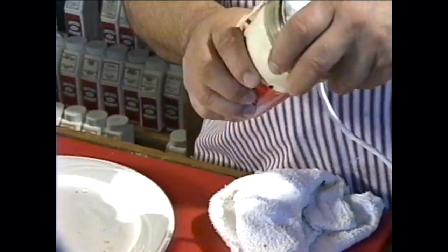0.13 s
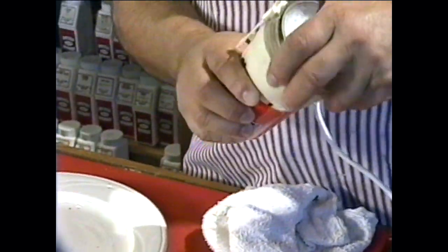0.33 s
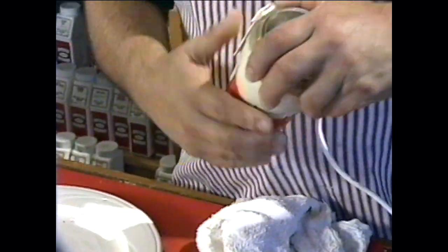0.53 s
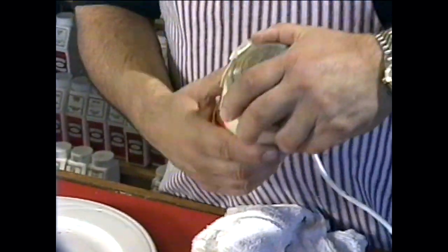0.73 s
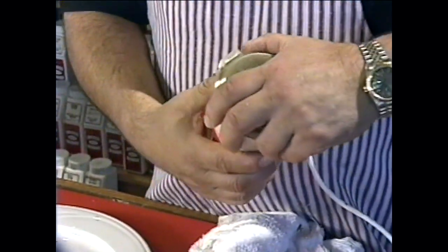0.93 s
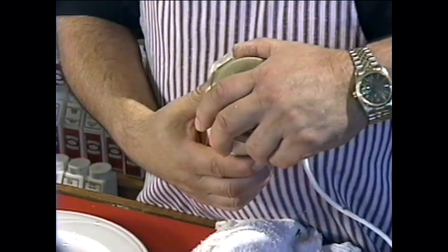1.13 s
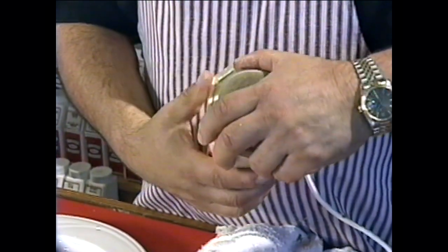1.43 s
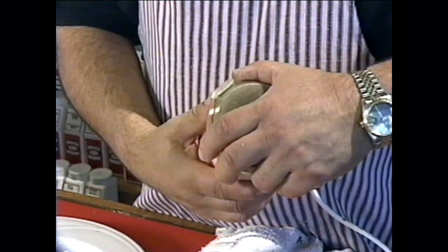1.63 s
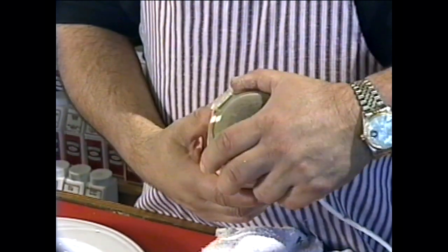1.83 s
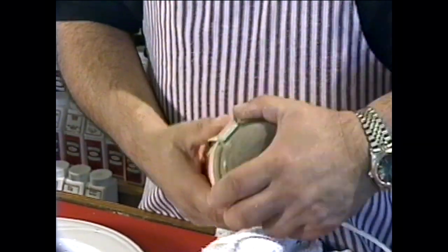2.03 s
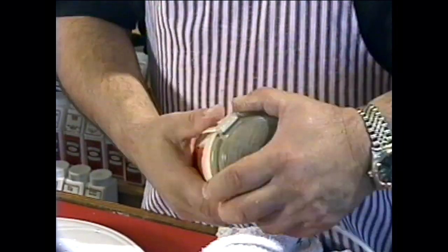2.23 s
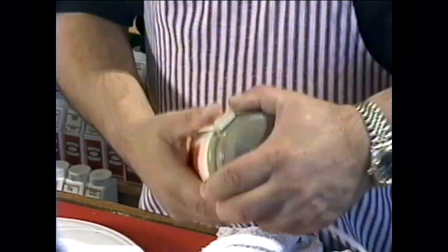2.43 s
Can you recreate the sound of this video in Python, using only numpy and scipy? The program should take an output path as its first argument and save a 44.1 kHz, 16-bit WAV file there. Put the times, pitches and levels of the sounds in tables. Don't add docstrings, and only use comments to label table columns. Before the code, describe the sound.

A small electric grinder clicks shut, then whirs up loudly, grinding hard seeds in its cup.

```python
import sys
import numpy as np
from scipy import signal
from scipy.fft import rfft, irfft, next_fast_len
from scipy.io import wavfile
from scipy.ndimage import uniform_filter1d, map_coordinates

SR = 44100
rng = np.random.default_rng(int(sys.argv[2]) if len(sys.argv) > 2 else 0)


def master_out(mix):
    frames = np.transpose(np.atleast_2d(mix))
    ceiling = np.clip(frames, -1, 1)
    pcm = np.round(ceiling * 32767).astype(np.int16)
    wavfile.write(sys.argv[1], SR, pcm)


def gain_from_db(level_db):
    decades = np.asarray(level_db, float) / 20
    return 10 ** decades


N = 114660


def unit(x):
    return x / np.sqrt(np.mean(x ** 2) + 1e-20)


def along(points, hz):
    f, v = np.transpose(points)
    return np.interp(np.log(hz + 1), np.log(f + 1), v)


def curves(rows, smooth_s):
    times, *columns = np.transpose(rows)
    t = np.arange(N) / SR
    width = max(1, int(smooth_s * SR))
    return [uniform_filter1d(np.interp(t, times, c), width, mode="nearest") for c in columns]


def wobble(rate):
    return map_coordinates(rng.standard_normal(2000), [np.arange(N) * rate / SR])


def filtered(x, response):
    m = next_fast_len(N + SR // 2)
    return irfft(rfft(x, m) * response(np.fft.rfftfreq(m, 1 / SR)), m)[..., :N]


def boosts(peaks, hz):
    return 1 + sum((gain_from_db(db) - 1) / (1 + (2 * (hz - c) / w) ** 2) for c, w, db in peaks)


def noise(spectrum):
    return unit(filtered(rng.standard_normal(N), lambda hz: gain_from_db(along(spectrum, hz))))


def add_at(track, start_s, sound):
    track[round(start_s * SR):][:len(sound)] += sound


# time in seconds, shaft speed in turns per second.
ROTOR = [(.70, 60), (.8, 156), (.9, 212), (.99, 242.5), (1.09, 265.5), (1.19, 281), (1.29, 292.7),
         (1.37, 297.5), (1.44, 299.6), (1.5, 270.5), (1.617, 219.5), (1.72, 257), (1.83, 279.2),
         (1.95, 294.5), (2.1, 306.5), (2.25, 315.3), (2.38, 318.5), (2.6, 323)]
# closed from and until, both in seconds.
POWER = [
    (0.703, 1.44),
    (1.617, 2.7),
]


def motor():
    t = np.arange(N) / SR
    speed, = curves(ROTOR, smooth_s=0.035)
    wander_hz = 0.3 * wobble(25.26)
    turn = 2 * np.pi * np.cumsum(speed + wander_hz) / SR
    beat = 2 * np.pi * 120 * t
    closed = sum((t > a) * (t < b) for a, b in POWER) * 1.
    on = uniform_filter1d(closed, int(0.0071 * SR))
    effort = np.clip(speed / 290, 0, 1) ** 2.8 * (t > POWER[0][0])
    slots = slot_whine(speed, turn, beat, on, effort)
    return np.sqrt(2) * (shaft_tones(speed, turn, beat, on, effort) + slots)


# multiple of shaft speed, level in dB, lower and upper mains sideband in dB,
# second lower sideband in dB.
SLOTS = [(8, -38, -5, -5.5, -26), (24, -48, -5, -8, -9), (32, -49, -4, -4, -8)]
# time in seconds, level in dB.
GRIP = [(.7, -7), (1.0, 6), (1.2, 2), (1.44, 0.5), (1.62, 3.5), (1.7, 5), (1.78, 5), (1.9, -0.5),
        (2.12, -1.5), (2.16, -5.5), (2.22, 3.5), (2.28, -2.5), (2.35, -6), (2.43, 0), (2.52, -6.5),
        (2.6, -4.5)]
# centre in Hz, width in Hz, boost in dB.
HOUSING = [(1800, 200, 3), (2262, 115, 20), (2530, 150, 11), (6770, 110, 25), (6940, 260, 19),
           (9050, 250, 13), (7540, 120, 16), (7700, 120, 15)]
HOUSING_DIP = [(2085, 90, -11), (6480, 160, -7)]


def slot_whine(speed, turn, beat, on, effort):
    grip_db, = curves(GRIP, smooth_s=.02)
    coast_db = -15 * (1 - on)
    upper_fade_db = -8 / (1 + np.exp((279 - speed) / 2))
    whine = np.zeros(N)
    for k, db, low_db, up_db, two_db in SLOTS:
        lower = gain_from_db(low_db) * np.sin(k * turn - beat)
        upper = gain_from_db(up_db + upper_fade_db) * np.sin(k * turn + beat)
        second_lower = gain_from_db(two_db) * np.sin(k * turn - 2 * beat)
        tone = np.sin(k * turn) + on * (lower + upper + second_lower)
        whine += gain_from_db(db + wobble(12.05)) * tone
    whine = whine * effort * gain_from_db(grip_db + coast_db)
    return filtered(whine, lambda hz: boosts(HOUSING, hz) * boosts(HOUSING_DIP, hz))


# multiple of shaft speed, level in dB, mains sideband in dB,
# level change while coasting in dB.
SHAFT = [(1, -30.5, -25, 0), (2, -39, -7, -2), (3, -42, -12, -4), (4, -52, -12, 10), (16, -30, -22, -2),
         (20, -46, -22, 11)]
# centre in Hz, width in Hz, boost in dB.
SHELL = [(620, 50, -4), (745, 120, 10), (860, 60, -8), (930, 70, 8), (1285, 50, 8), (5200, 250, -9)]


def shaft_tones(speed, turn, beat, on, effort):
    fan = 1 / (1 + np.exp((244 - speed) / 7))
    tones = np.zeros(N)
    for k, db, side_db, off_db in SHAFT:
        flutter_db = 2 * wobble(17) * (1 if 1 < k < 10 else .5)
        level = gain_from_db(db + off_db * (1 - on) + flutter_db)
        drive = fan if k > 10 else effort
        pulsing = 1 + 2 * on * gain_from_db(side_db) * np.cos(beat + k)
        tones += level * drive * pulsing * np.sin(k * turn)
    return filtered(tones, lambda hz: boosts(SHELL, hz))


# time in seconds, level in dB, body in dB, brightness in dB per octave,
# fine spray in dB.
SEEDS = [(.692, -41.5, -3, -5.5, -6), (.706, -9, -10, 3, 2.5), (.72, -7.5, -8, 3.5, 0.5),
         (.754, -16.5, -7.5, 0.5, 1), (.85, -19, -10.5, -1, 0.5), (1.0, -16.5, -14, 0, 0),
         (1.25, -15.5, -15.5, -0.5, -1), (1.5, -17, -13, 1, -1), (1.7, -17.5, -12.5, 0.5, -1),
         (1.9, -17.5, -14, -1, 0.5), (2.05, -18, -13, 0, 0), (2.17, -19, -14, -1.5, 1.5),
         (2.21, -16.5, -9.5, 1.5, 1), (2.34, -18, -13, 0.5, 2.5), (2.45, -17, -10.5, 1, 0.5),
         (2.55, -18, -13.5, 1.5, 2.5), (2.6, -18, -13.5, -1.5, 4)]
# time in seconds, rise over the grind in dB, decay in seconds.
TOSSES = [(.795, 3.5, 0.034), (.879, 0.5, .01), (.923, 3, .04), (1.1, 1.5, .02), (1.147, 0, .008),
          (1.276, 3.5, 0.012), (1.42, 2.5, 0.0056), (1.48, 0.5, 0.025), (1.652, 3.5, .016),
          (1.709, 1.5, .012), (1.752, 5, .016), (1.825, 2, 0.011), (2.002, 1.5, .015), (2.091, 3, .01),
          (2.113, 4, 0.012), (2.195, 3, 0.0055), (2.205, 2.5, .005), (2.218, 0.5, 0.0055),
          (2.24, 5.5, .012), (2.29, 1, .01), (2.3, 3.5, .008), (2.318, 2.5, .004), (2.37, 8, .005),
          (2.385, 5, .01), (2.49, 6, 0.029), (2.575, 5, .015)]
# frequency in Hz, density in dB per Hz.
HISS = [(700, -50), (1300, -21), (2000, -17), (3300, -15), (5500, -7.5), (8500, -3), (13000, -3),
        (16000, -4.5)]
BODY = [(200, -5.5), (340, -4.5), (500, -2), (750, -2.5), (1000, -1.5), (1200, -11), (1800, -15.5),
        (3000, -46)]
RUMBLE = [(12, -32), (20, -1), (32, -4.5), (50, -26), (100, 1), (160, -17), (220, -7.5), (440, -48)]
# centre in Hz, width in Hz, boost in dB.
CUP = [(777, 100, 5), (940, 140, 1), (2575, 910, 8.5), (4210, 870, 5.5), (6050, 1300, 2.5),
       (9150, 500, 3.5), (11000, 2000, 3.5)]


def grinding():
    t = np.arange(N) / SR
    level_db, body_db, tilt_db, spray_db = curves(SEEDS, smooth_s=0.0022)
    toss_db = sum(db * np.exp(-np.abs(t - s) / np.where(t > s, d, .004)) for s, db, d in TOSSES)
    drive = seed_impacts(t, tilt_db, spray_db)
    hiss = unit(filtered(drive, lambda f: gain_from_db(along(HISS, f)) * boosts(CUP, f)))
    body = unit(filtered(drive, lambda f: gain_from_db(along(BODY, f)) * boosts(CUP, f)))
    swell = gain_from_db(level_db + toss_db + 0.61 * wobble(30.2) + 1.07 * wobble(120)) * (t > SEEDS[0][0])
    rumble_level = gain_from_db(-43 + 0.84 * wobble(15) + 0.51 * toss_db) * (t > POWER[0][0])
    seeds = hiss + gain_from_db(body_db + 0.62 * wobble(18.16)) * body
    return swell * seeds + rumble_level * noise(RUMBLE)


def seed_impacts(t, tilt_db, spray_db):
    grain_share = .27
    hits = (rng.random(N) < 2500 / SR) * rng.standard_normal(N)
    hits = hits * gain_from_db(1.9 * rng.exponential(size=N))
    drive = np.sqrt(grain_share) * unit(hits) + np.sqrt(1 - grain_share) * rng.standard_normal(N)
    hz, frame_s, z = signal.stft(drive, SR, nperseg=256)
    patches = uniform_filter1d(rng.standard_normal(z.shape), size=7, axis=0)
    patches = unit(uniform_filter1d(patches, size=12, axis=1))
    octaves = np.log2(np.clip(hz, 5000, SR) / 10000)
    tilt = np.interp(frame_s, t, tilt_db) * octaves[:, None]
    spray_shape = np.tanh((hz - 11500) / 1000) * (hz > 8000)
    spray = np.interp(frame_s, t, spray_db) * spray_shape[:, None]
    return signal.istft(z * gain_from_db(.8 * patches + tilt + spray), SR, nperseg=256)[1][:N]


# time in seconds, crack in dB, knock in dB, ring T60 in seconds.
CLICKS = [(0.1207, -24, -29, 0.045), (.187, -48, -37, 0.033), (0.6816, -21, -39, 0.037),
          (0.707, -31, -25.5, .12)]
# frequency in Hz, level in dB.
LID = [(210, -3), (430, -5.5), (590, -6.5), (730, -10), (880, -1.5), (1020, -27), (1500, -8)]
# frequency in Hz, density in dB per Hz.
CRACK = [(880, -21), (1500, -8), (5120, -10), (6560, -5.5), (10800, -2.5), (12700, -15), (14100, -6),
         (16000, -22)]


def lid_and_switch():
    t = np.arange(SR // 8) / SR
    crack, knock = np.zeros(N), np.zeros(N)
    for s, crack_db, knock_db, t60 in CLICKS:
        snap = gain_from_db(-60 * (t / 0.0063) ** 3) + 0.16 * gain_from_db(-60 * t / t60)
        add_at(crack, s, gain_from_db(crack_db) * snap * rng.standard_normal(len(t)))
        modes = sum(gain_from_db(db + rng.normal(0, 1.1)) * np.sin(2 * np.pi * hz * t) for hz, db in LID)
        add_at(knock, s, gain_from_db(knock_db - 60 * t / t60) * modes)
    return filtered(crack, lambda f: 2 * gain_from_db(along(CRACK, f))) + knock


# time in seconds, level in dB, frequency in Hz.
RINGS = [(.706, -16, 750), (.714, -18, 360), (.752, -14, 2300), (.796, -14, 2300), (.803, -25, 2570),
         (.74, -23, 900), (1.416, -23, 1010), (1.418, -24, 780), (1.497, -27, 460), (2.372, -28, 620),
         (2.378, -22, 5750)]


def housing_rings():
    t = np.arange(SR // 8) / SR
    rings = np.zeros(N)
    for s, db, hz in RINGS:
        attack = 1 - np.exp(-t / 0.0011)
        add_at(rings, s, gain_from_db(db - 60 * t / .033) * attack * np.sin(2 * np.pi * hz * t))
    return rings


# time in seconds, peak in dB.
TICKS = [(.1454, -35), (.2044, -31.5), (.2598, -29), (.3504, -35), (.4211, -36), (.437, -35), (0.4712, -28),
         (.5118, -31), (.514, -32), (.5172, -19), (.52, -28), (.524, -30), (0.5315, -21), (0.534, -32),
         (.5425, -31), (.5462, -30), (.5485, -31), (.5517, -20), (0.553, -18.5), (.5555, -27), (.5623, -22),
         (.5685, -27), (.573, -28), (.5775, -31), (0.582, -27), (.5865, -27), (.595, -27), (.602, -20.5),
         (.6275, -35)]
# time in seconds, level in dB.
TRICKLE = [(.125, -48), (.15, -50), (.22, -56), (.37, -60), (.505, -52), (.52, -43.5), (.6, -44.5),
           (.62, -48), (.69, -54)]
# frequency in Hz, density in dB per Hz.
TICK = [(1760, -42.5), (3000, -20), (4500, -13.5), (4900, -9), (5290, -10.5), (9400, -2), (12900, -9),
        (16000, -23)]


def loose_seeds():
    t, full = np.arange(SR // 8) / SR, np.arange(N) / SR
    ticks = np.zeros(N)
    for s, db in TICKS:
        decay = gain_from_db(db - 3 - 60 * t / .005) + gain_from_db(db - 19 - 60 * t / .025)
        add_at(ticks, s, decay * rng.standard_normal(len(t)))
    slide_db, = curves(TRICKLE, smooth_s=.005)
    hits = (rng.random(N) < 700 / SR) * rng.standard_normal(N) + 0.17 * rng.standard_normal(N)
    ticks += gain_from_db(slide_db + 4.5) * unit(hits) * (full > .12) * (full < .7)
    return filtered(ticks, lambda f: 2 * gain_from_db(along(TICK, f)))


def hands():
    t = np.arange(N) / SR
    shift_s = .57
    squeak = gain_from_db(-59.5 + 3 * wobble(36.6)) * np.exp(-((t - shift_s) / .1) ** 2)
    squeak = squeak * noise([(4000, -60), (4950, 0), (6000, -60)])
    rub = gain_from_db(-55 + 2.5 * wobble(23.4)) * (t > .12) * (1 + 0.73 * np.exp(-((t - shift_s) / 0.11) ** 2))
    rub = rub * noise([(60, -28), (150, -5.5), (900, -11), (1500, -15.5), (4000, -34)])
    return squeak + rub


# frequency in Hz, density in dB per Hz.
ROOM = [(12, -42), (30, -2), (55, -15), (120, -6.5), (300, -18), (1000, -20.5), (2700, -30), (16000, -25.5)]
# frequency in Hz, level in dB.
HUM = [(30, -82), (90, -60), (140, -61), (727, -61.5), (904, -65)]


def room():
    t = np.arange(N) / SR
    hum = sum(gain_from_db(db + 3.5 + 2 * wobble(5.2)) * np.sin(2 * np.pi * hz * t) for hz, db in HUM)
    return gain_from_db(-48.5) * noise(ROOM) + hum


def echo(near):
    t = np.arange(SR // 3) / SR
    tail = rng.standard_normal(len(t)) * gain_from_db(-60 * t / 0.17) * (t > .004)
    return gain_from_db(-17) * signal.fftconvolve(near, tail / np.linalg.norm(tail))[:N]


def scene():
    near = motor() + grinding() + lid_and_switch() + housing_rings() + loose_seeds() + hands()
    mono = near + echo(near) + room()
    return np.array([mono, mono])


def low_pass(x):
    return signal.sosfilt(signal.butter(12, 17080, fs=SR, output="sos"), x)


def record(dry):
    peak, top_hz, edge_hz = 1.05, 15830, 120
    soft = dry / (1 + np.abs(dry / peak) ** 4) ** (1 / 4)

    def band_limit(hz):
        return np.sin(np.pi / 2 * np.clip((top_hz - hz) / edge_hz + .5, 0, 1)) ** 2

    return low_pass(filtered(soft, band_limit))


dry = scene()
out = record(dry)
master_out(out)
```